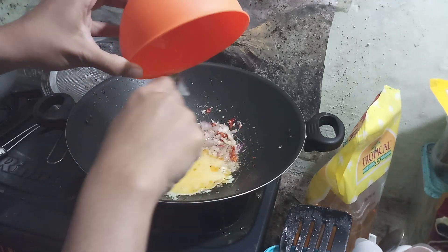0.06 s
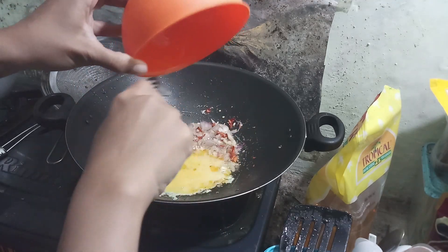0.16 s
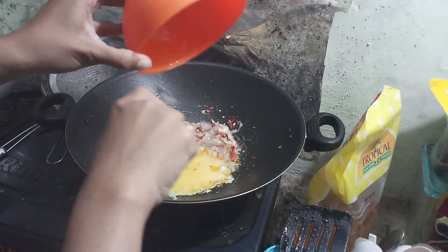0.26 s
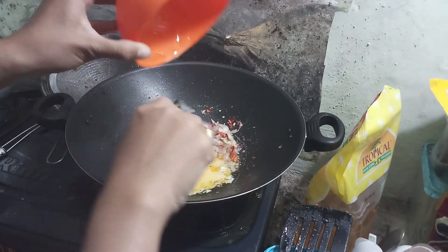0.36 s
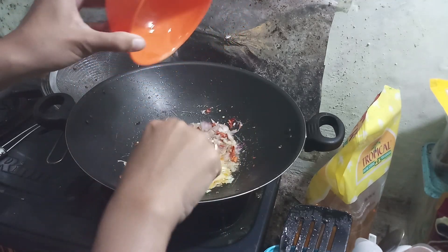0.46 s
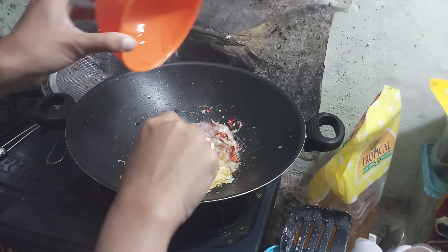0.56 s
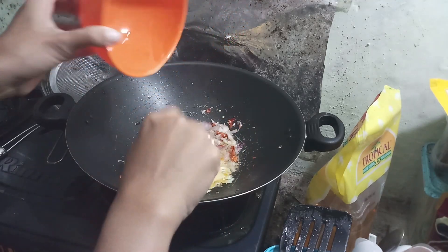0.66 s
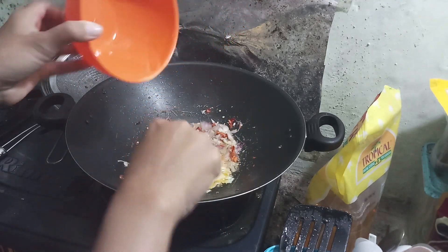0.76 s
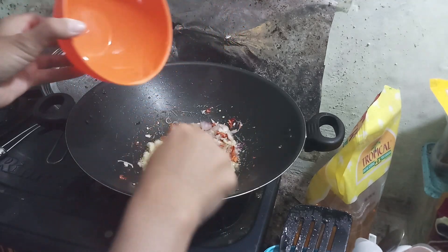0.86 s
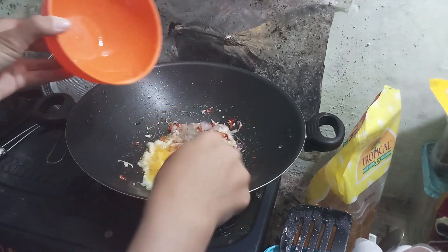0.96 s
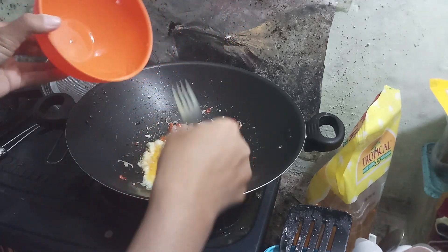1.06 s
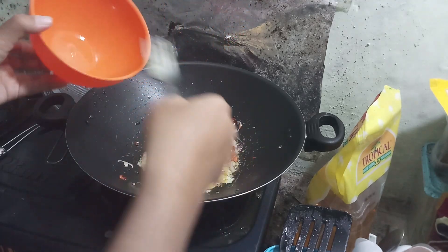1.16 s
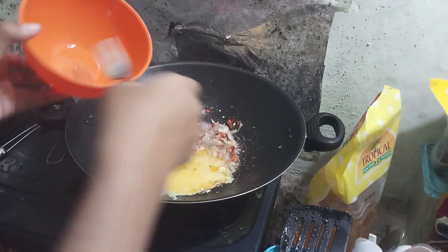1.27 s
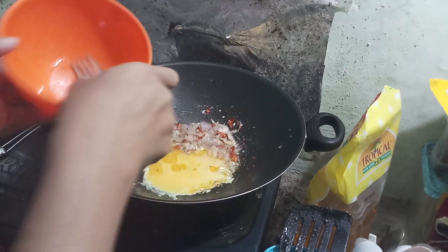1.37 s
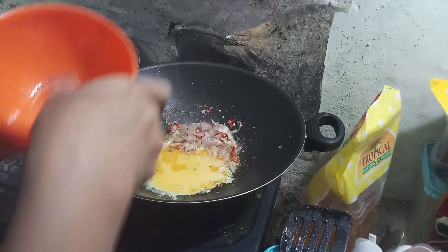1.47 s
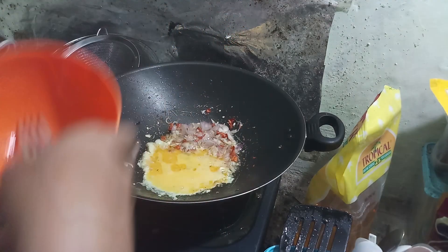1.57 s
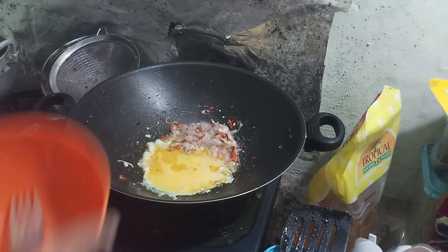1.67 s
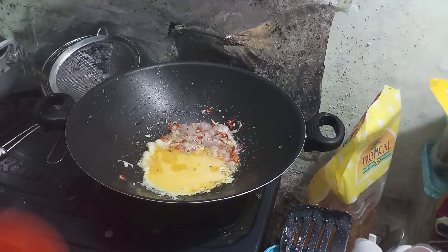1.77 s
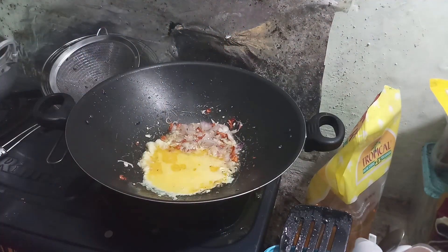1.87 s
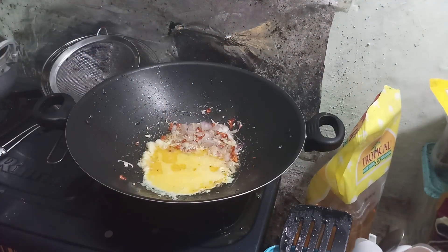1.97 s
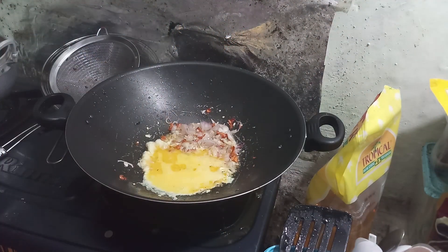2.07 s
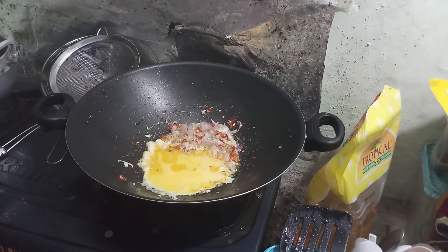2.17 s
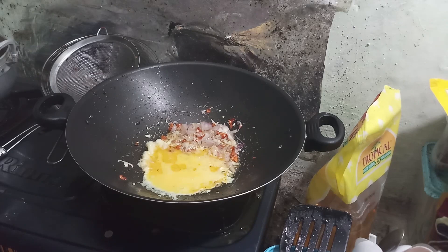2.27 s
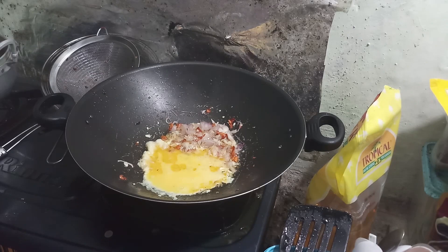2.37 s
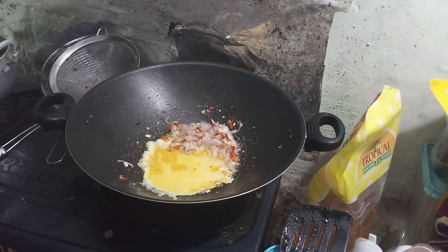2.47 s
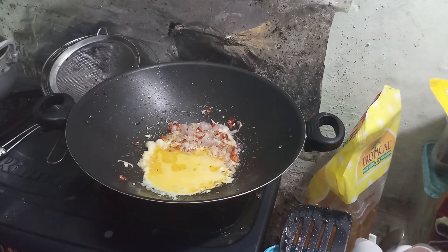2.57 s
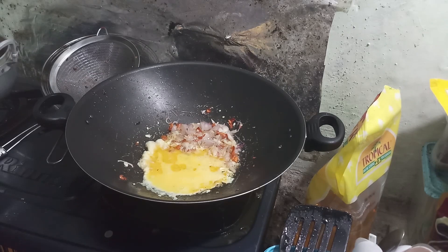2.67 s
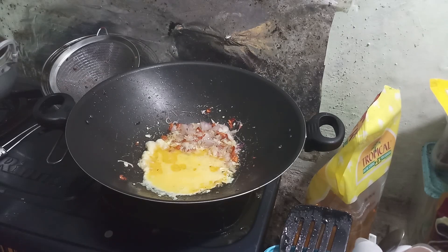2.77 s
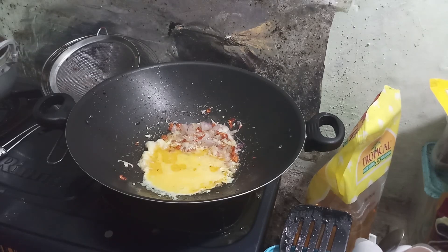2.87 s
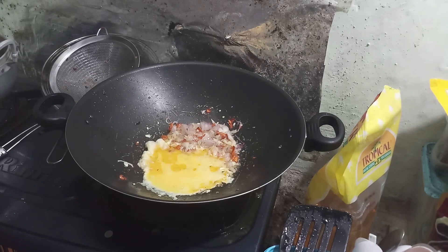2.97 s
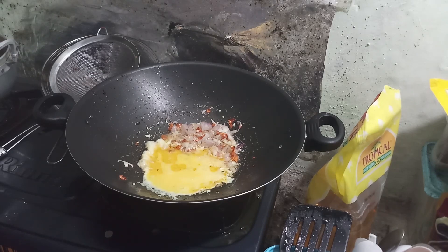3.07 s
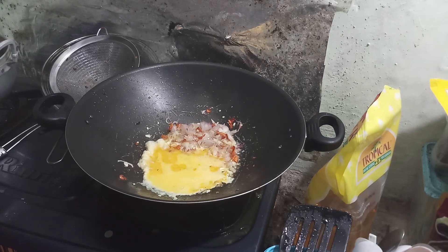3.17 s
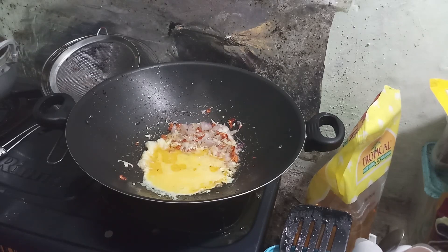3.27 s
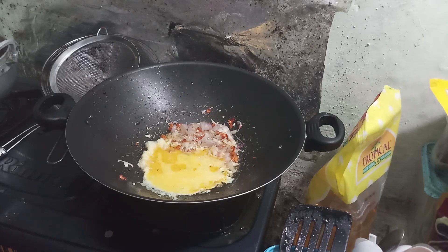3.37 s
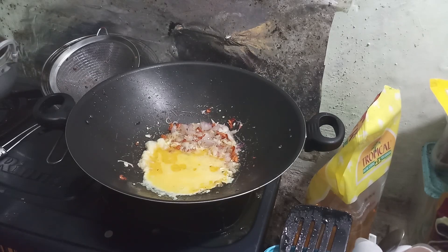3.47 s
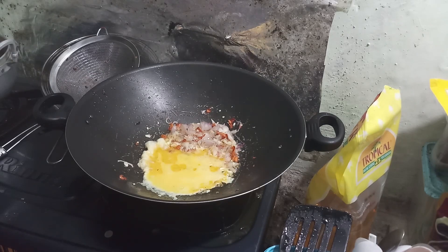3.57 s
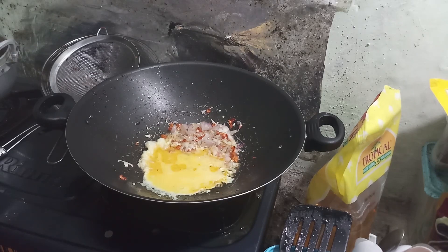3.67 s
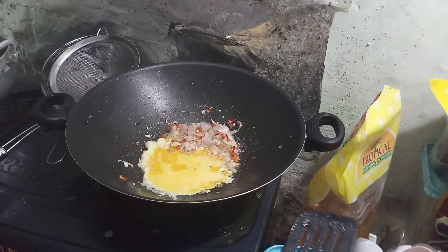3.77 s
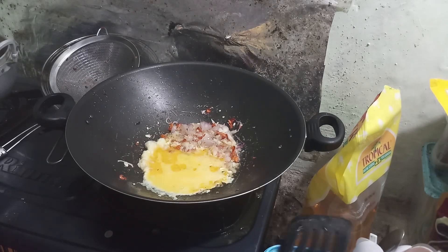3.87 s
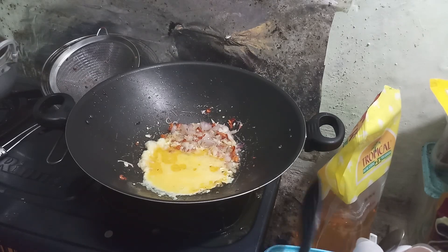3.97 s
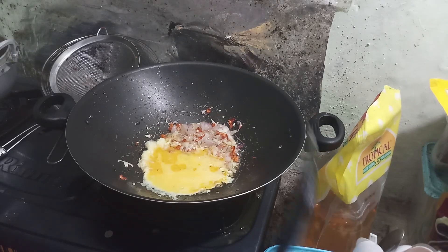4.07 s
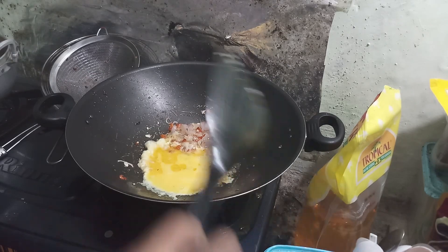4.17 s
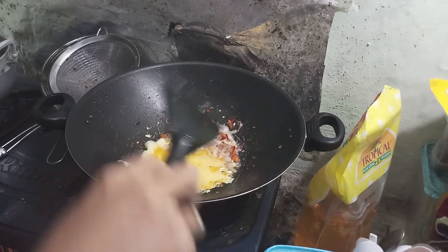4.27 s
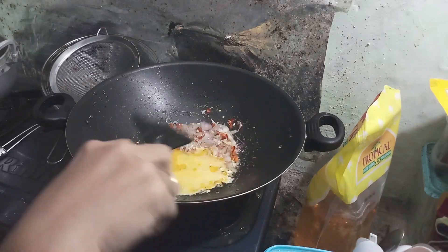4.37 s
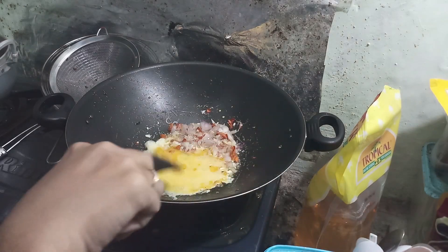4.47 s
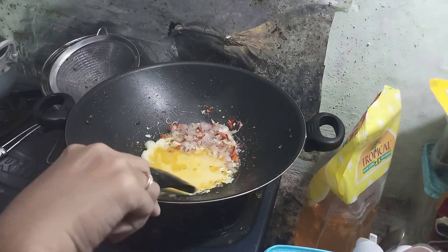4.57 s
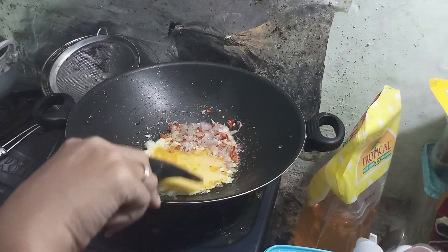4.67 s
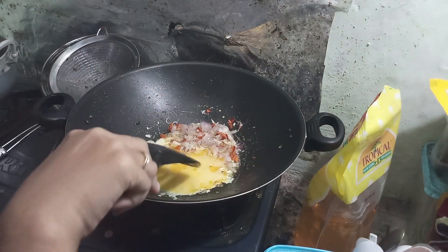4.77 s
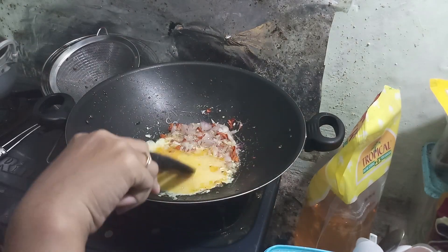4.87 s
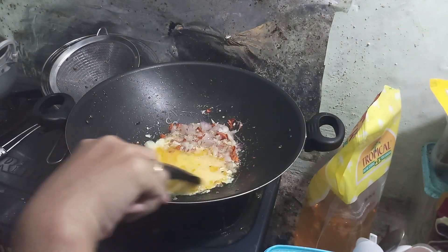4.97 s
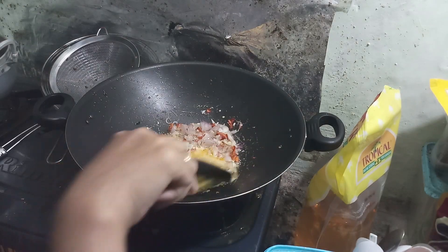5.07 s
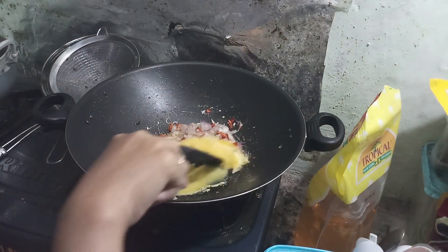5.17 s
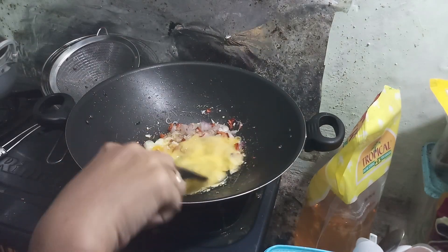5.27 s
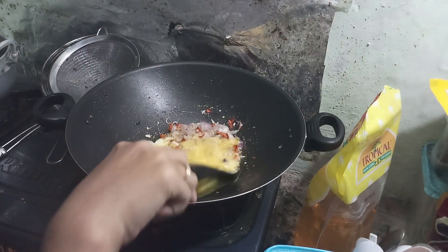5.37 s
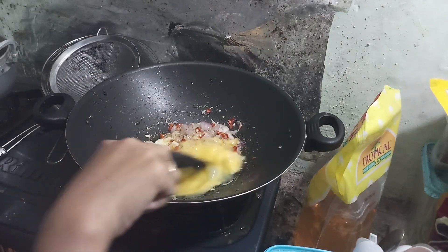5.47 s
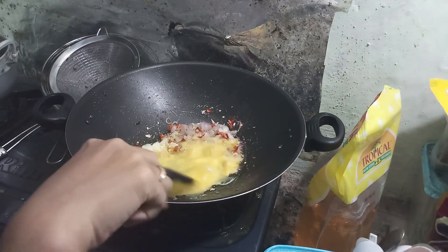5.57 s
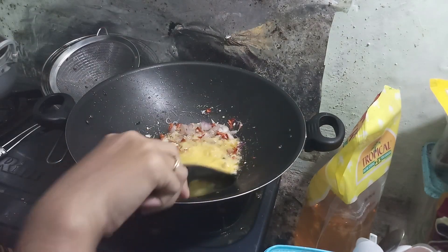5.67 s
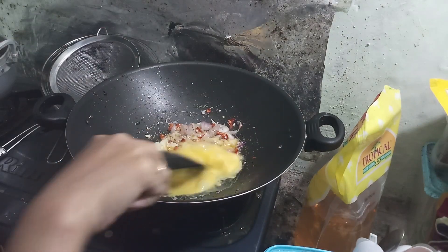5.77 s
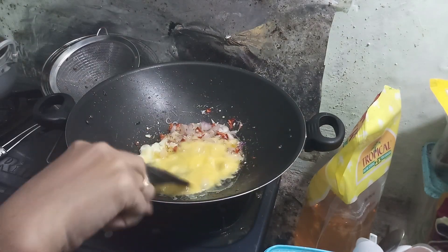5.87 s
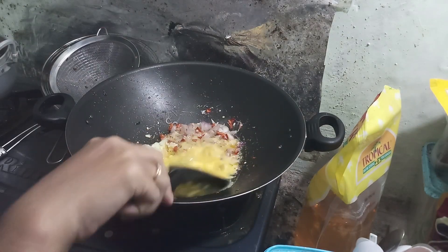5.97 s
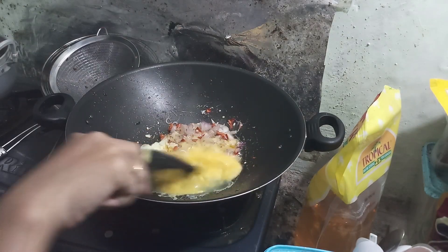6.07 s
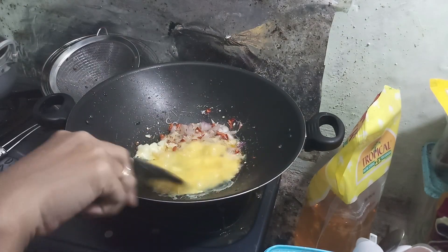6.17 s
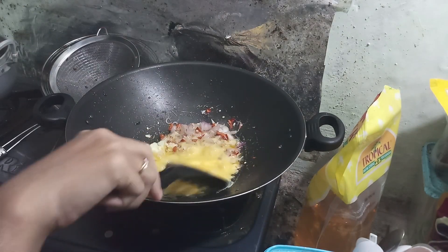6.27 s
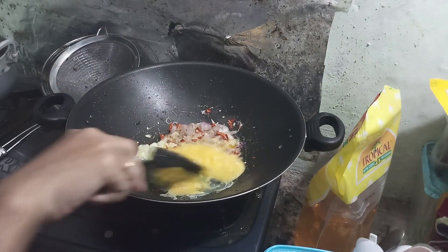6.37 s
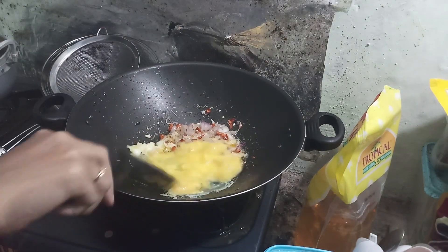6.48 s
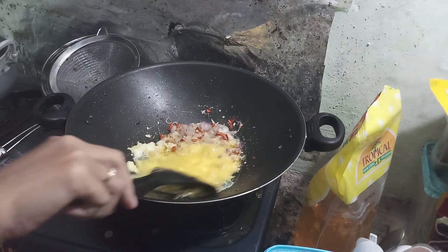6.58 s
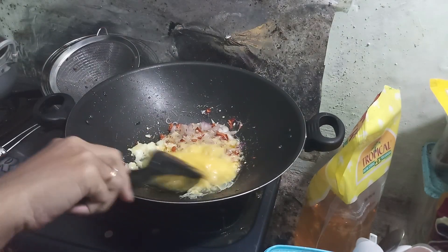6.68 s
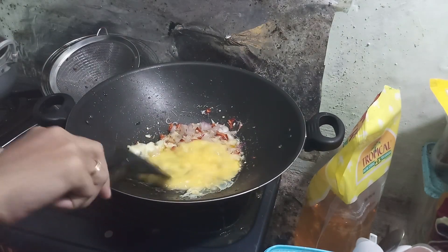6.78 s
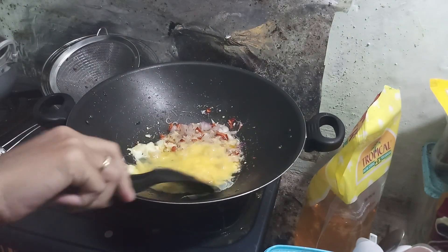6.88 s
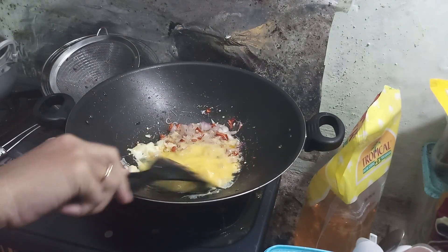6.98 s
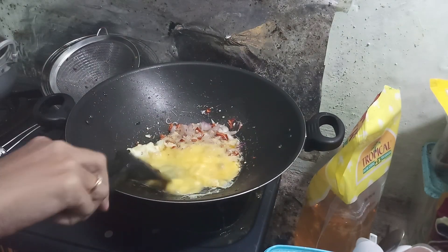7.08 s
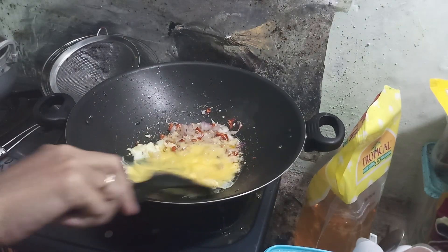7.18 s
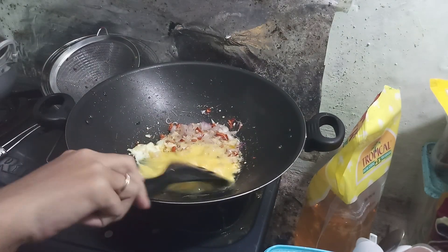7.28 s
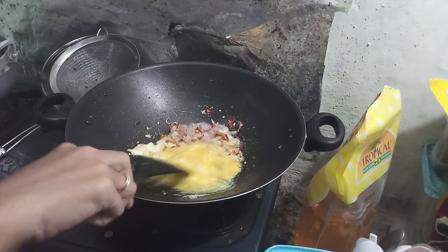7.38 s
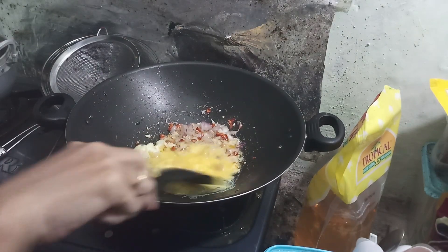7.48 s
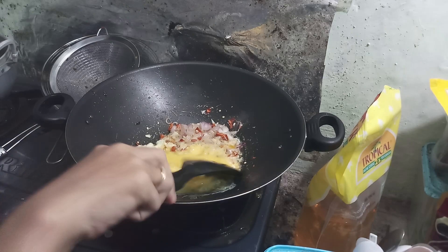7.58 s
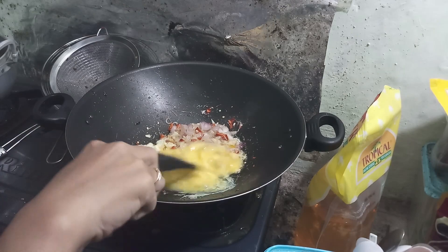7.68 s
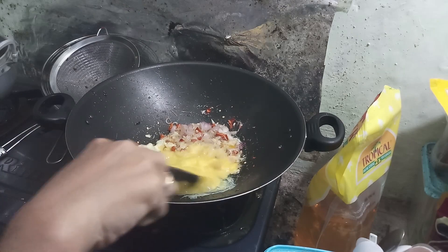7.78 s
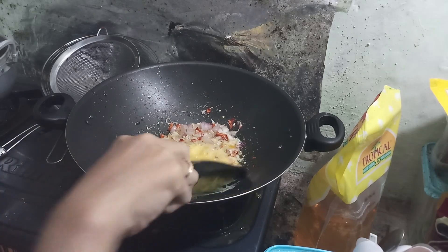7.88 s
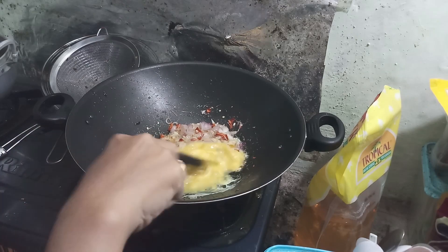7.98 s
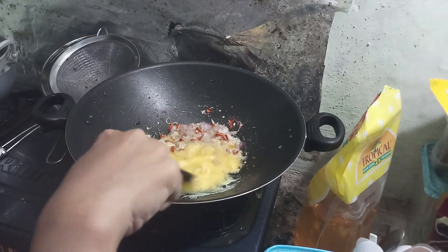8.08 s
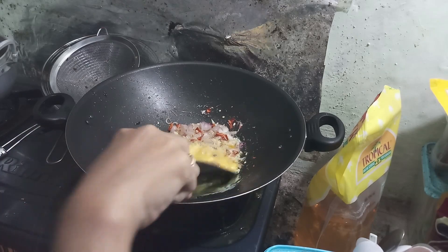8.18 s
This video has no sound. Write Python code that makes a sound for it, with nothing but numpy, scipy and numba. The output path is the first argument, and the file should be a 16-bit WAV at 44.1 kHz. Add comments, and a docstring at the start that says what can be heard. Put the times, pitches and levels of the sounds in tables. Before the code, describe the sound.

Close to the stove in a small kitchen, a soft, steady frying sizzle runs over a low gas rumble. A short spoon scrape and a sharp knock on a plastic bowl come first, then the louder clatter of the bowl landing on the counter. A spatula is lifted with a soft bump and starts stirring, lightly tapping and rasping against the wok as the turned egg hisses.

```python
"""Small kitchen: beaten egg sizzles quietly in a wok, steam bubbles bursting over a rumbling gas flame.
A spoon sticks and slips along a plastic bowl, then knocks it. The bowl is set down and rocks once.
A spatula is picked up with a dull bump, then taps and scrapes through the egg: its slips shake
the wok and rasp at the edge, and fresh egg hisses on the hot metal."""
import sys
import numpy as np
from scipy import signal
from scipy.fft import rfft, irfft, next_fast_len
from scipy.io import wavfile
from scipy.ndimage import uniform_filter1d
from numba import njit

SR = 44100
rng = np.random.default_rng(int(sys.argv[2]) if len(sys.argv) > 2 else 0)


def unload_wav(signal):
    """Save mono or channel-first audio to the path in sys.argv[1] as 16-bit WAV at rate SR, clipped to [-1, 1]."""
    wavfile.write(
        sys.argv[1],
        SR,
        np.round(np.clip(np.atleast_2d(signal).T, -1, 1) * 32767).astype(np.int16),
    )


N = 362502
TIME_S = np.arange(N) / SR
FFT_SIZE = next_fast_len(N, True)

# frying intensity (time [s], relative level [dB])
FRYING_CURVE = [(0.0, -49), (0.75, -51.5), (1.42, -51), (1.6, -49), (2.36, -51), (3.58, -53), (5.1, -51)]
# loudest oil spits (time [s], level [dB], pitch [Hz])
LOUD_SPITS = [(1.191, -46, 9000), (2.2196, -41.5, 7040), (3.6015, -42, 8800), (4.1847, -45.5, 12000),
              (4.262, -43.5, 9900), (4.3628, -46, 6400), (4.6756, -47.5, 4950), (5.005, -44, 5470),
              (6.1249, -43, 3950), (8.178, -39, 9050)]
# stove spectra (frequency [Hz], gain [dB])
SIZZLE_SPECTRUM = [(200, -17), (500, -7), (850, -4), (1200, -2.5), (1700, -0.5), (3000, -0.5), (4400, 0.5),
                   (7500, 0.5), (10000, -3), (12500, -2.5), (16000, -7.5)]
FLAME_SPECTRUM = [(20, -18), (40, -22), (60, -0.5), (75, -6), (97, 2), (125, -8), (170, -13), (240, -27),
                  (345, -15), (450, -35.5), (650, -33), (900, -60), (3000, -54)]
GAS_SPECTRUM = [(700, -31), (1020, -26), (1190, 0.5), (1290, 12), (1380, -14.5), (2000, -35)]
# spoon pushes along the bowl (start [s], length [s], relative level [dB])
SPOON_DRAGS = [(0.0, 0.028, -50), (0.096, 0.22, -45), (0.143, 0.036, -37.5), (0.211, 0.057, -30.5)]
# bowl rubbed, knocked, set down; wok tapped (frequency [Hz], relative level [dB], t60 [s])
BOWL_RUB_MODES = [(484, -7, 0.14), (603, 16, 0.057), (833, -1, 0.059), (917, 2.5, 0.041),
                  (1085, 2.5, 0.063), (1257, 3, .055), (1630, -10.5, .04), (2140, -8.5, 0.013),
                  (4100, -0.5, 0.0037)]
BOWL_KNOCK_MODES = [(353, -3, 0.33), (849, 2, .12), (1305, 8, 0.14), (2290, -8, 0.15), (3370, 5, .12),
                    (3930, -17, 0.055), (4800, -28, .13), (6900, -12, 0.046)]
BOWL_LANDING_MODES = [(172, -12, .3), (318, -7, .3), (533, -6, .22), (614, -3, .18), (800, 0, .14),
                      (937, -6, .28), (1012, -4, .14), (1663, -9, .15), (1717, -4, .16), (2403, -15, .22)]
WOK_TAP_MODES = [(336, -8, 0.3), (540, -15, 0.28), (678, 9, 0.22), (942, 1.5, 0.12), (1316, 7, 0.13),
                 (1576, 14.5, 0.087), (2300, 19, 0.11), (3955, 30.5, 0.014)]
# spoon on bowl, bowl on counter, spatula pickup (time [s], level [dB], contact cutoff [Hz])
KNOCK_HITS = [(1.4772, -19.5, 12000), (1.4848, -19, 15000), (1.502, -30.5, 6000), (1.511, -35, 15000),
              (1.5665, -35.5, 1400), (1.578, -39, 8000), (1.593, -38, 4000)]
LANDING_HITS = [(2.8149, -13, 2520), (2.8174, -22, 12000), (2.855, -30.5, 14000), (2.8746, -30.5, 15000),
                (3.003, -41, 2500), (3.009, -47, 2500)]
BUMP_HITS = [(3.869, -38, 9000), (3.882, -34.5, 400), (3.906, -48, 1300), (3.924, -41.5, 500)]
# spectra of those impacts (frequency [Hz], gain [dB])
KNOCK_SPECTRUM = [(59, -51), (110, -5), (365, -14.5), (700, -10.5), (900, -6.5), (1100, -12), (1280, 1.5),
                  (1500, -11), (2220, -3), (2860, -12.5), (3940, 1), (5080, -12.5), (6800, -8.5),
                  (16000, -21)]
LANDING_SPECTRUM = [(40, -22), (110, -7), (230, -3.5), (320, -3.5), (420, -5), (620, -4.5), (850, 3),
                    (1120, -5.5), (1650, -6.5), (2050, -13.5), (2400, -6.5), (2800, -15.5), (3600, -8),
                    (5600, -8), (9000, -15.5), (16000, -17)]
BUMP_SPECTRUM = [(50, -26), (100, 10.5), (170, 3), (330, -1), (700, -6.5), (1300, -16.5), (4000, -14),
                 (7000, -9), (11000, -24)]
# blade taps on the wok (time [s], level [dB], contact pitch [Hz])
TAP_HITS = [(5.017, -48, 1360), (5.245, -42, 1800), (5.4535, -38, 517), (5.8296, -40.5, 696),
            (5.9593, -39.5, 846), (6.0671, -43.5, 1070), (6.2412, -34.5, 815), (6.558, -39, 830),
            (6.6996, -38.5, 314), (6.9436, -41.5, 1010), (7.189, -44, 1330), (7.5093, -40, 764),
            (7.657, -29, 4930), (7.6585, -36.5, 1290), (7.8361, -41, 825), (7.9633, -40.5, 1290),
            (8.1384, -40, 885)]
# spatula strokes, relative levels
# (start [s], length [s], push [dB], edge scrape [dB], egg hiss [dB], contact pitch [Hz])
SPATULA_STROKES = [(5.173, 0.14, -48.5, -46.5, -50, 1550), (5.347, 0.2, -50, -48, -57, 1060),
                   (5.532, 0.068, -49, -39.5, -47.5, 1670), (5.726, 0.058, -59, -44, -47, 1900),
                   (5.814, 0.063, -42, -43.5, -52, 950), (5.897, 0.097, -51, -50, -53, 1150),
                   (6.155, 0.17, -48.5, -47.5, -51, 1200), (6.352, 0.15, -45, -46.5, -53, 1100),
                   (6.503, 0.18, -49.5, -49, -51, 1360), (6.682, 0.22, -45, -47, -53, 1050),
                   (7, 0.14, -42, -46, -51, 1200), (7.297, 0.067, -48.5, -47, -47, 1240),
                   (7.38, 0.094, -48, -49, -66, 1050), (7.549, 0.11, -54, -45, -60, 1400),
                   (7.682, 0.062, -46.5, -45, -48.5, 1030), (7.823, 0.13, -51, -48.5, -55.5, 1000),
                   (7.944, 0.17, -46, -46.5, -49.5, 1190), (8.105, 0.093, -48, -44.5, -50.5, 1360)]
# hollow wok under the blade, blade edge, fresh egg (frequency [Hz], gain [dB])
WOK_SPECTRUM = [(60, -21), (150, -9.5), (210, -3.5), (245, -6), (290, 1.5), (350, 2.5), (420, -5.5),
                (520, -2.5), (750, -10), (1100, -30), (2500, -60)]
EDGE_SPECTRUM = [(300, -24), (550, -3), (700, 7), (980, 4.5), (1250, 0), (1420, 1), (1600, -2),
                 (2300, -0.5), (3200, -4.5), (5000, -19), (12000, -14)]
EGG_SPECTRUM = [(1500, -15), (3000, -2), (3900, 0), (4400, 5.5), (6100, -0.5), (8000, -3.5), (10000, -11),
                (12500, -11), (16000, -17)]
# kitchen decay (frequency [Hz], t60 [s])
ROOM_T60 = [(100, 0.48), (400, 0.29), (1500, 0.41), (5000, 0.3), (14000, 0.13)]
# diffuse field (frequency [Hz], left-right coherence [ratio])
COHERENCE = [(60, 1), (130, 0.88), (290, 0.79), (640, 0.26), (1400, 0.019), (15000, 0.06)]
# microphone port imbalance (frequency [Hz], left minus right [dB])
PORT_BALANCE = [(60, -2), (200, 0.5), (380, -6), (700, 5.5), (1290, 2), (2400, 0.5), (4400, 1.5),
                (8100, -1), (15000, 3)]


def from_db(db):
    """Decibels to gain."""
    return 10 ** (np.asarray(db) / 20)


def unit_rms(x):
    """Scale to rms 1."""
    return x / np.sqrt(np.mean(x ** 2) + 1e-20)


def at_hz(table, hz):
    """Interpolate on a log-frequency axis."""
    knots_hz, values = np.transpose(table)
    return np.interp(np.log(hz), np.log(knots_hz), values)


def colour(x, spectrum):
    """Minimum-phase filter with the given spectrum."""
    size = 2 * next_fast_len((x.shape[-1] + SR // 4) // 2, True)
    hz = np.maximum(np.fft.rfftfreq(size, 1 / SR), 1)
    cepstrum = irfft(np.log(from_db(at_hz(spectrum, hz))), size)
    cepstrum[1:size // 2] *= 2
    cepstrum[size // 2 + 1:] = 0
    return irfft(rfft(x, size) * np.exp(rfft(cepstrum)), size)[..., :x.shape[-1]]


def convolve(x, response):
    """Mono signal through a stereo response."""
    return signal.oaconvolve(x[None], response, axes=1)[:, :len(x)]


def soften(x, cutoff_hz):
    """First-order low-pass, as from a soft contact."""
    return signal.sosfilt(signal.butter(1, min(cutoff_hz, SR * .45), fs=SR, output="sos"), x)


def resonate(x, hz, q):
    """One broad resonance."""
    radius = np.exp(-np.pi * hz / q / SR)
    return signal.lfilter([1, 0, -1], [1, -2 * radius * np.cos(2 * np.pi * hz / SR), radius ** 2], x)


@njit
def glide(x, step_rad, damping):
    """Resonance with a moving centre, given as phase step per sample."""
    out, low, band = np.zeros(len(x)), 0., 0.
    for i in range(len(x)):
        low += step_rad[i] * band
        band += step_rad[i] * (x[i] - low - damping * band)
        out[i] = band / np.sqrt(step_rad[i])
    return out


def diffuse(size):
    """Noise from all sides: coherent bass, unrelated treble."""
    coherence = np.clip(at_hz(COHERENCE, np.fft.rfftfreq(size, 1 / SR) + 1), -1, 1)
    mid, side = rfft(rng.standard_normal((2, size)))
    return unit_rms(irfft(np.sqrt(1 + coherence) * mid + np.sqrt(1 - coherence) * side * [[1], [-1]], size))


def steady_noise(spectrum):
    """Coloured diffuse noise, rms 1."""
    return unit_rms(colour(diffuse(FFT_SIZE)[:, :N], spectrum))


def kitchen(direct_db, tail_db, early_t60_s=0.052):
    """Room response: direct sound and band-wise tail, in dB re the early reflections."""
    t = TIME_S[:SR // 2]
    noise, hz = rfft(diffuse(len(t))), np.fft.rfftfreq(len(t), 1 / SR)
    # small surfaces near the stove reflect little bass
    early = unit_rms(irfft(noise * hz / (hz + 300), len(t)) * from_db(-60 * t / early_t60_s))
    edges_hz = [40, 300, 1200, 3500, 8000, 17000]
    tail = 0
    for low, high in zip(edges_hz, edges_hz[1:]):
        band = irfft(noise * (hz >= low) * (hz < high), len(t))
        tail = tail + band * from_db(-60 * t / at_hz(ROOM_T60, np.sqrt(low * high)))
    direct = np.zeros_like(early)
    direct[0, 0] = direct[1, 2] = 1   # right lags 2 samples
    return from_db(direct_db) * unit_rms(direct) + early + from_db(tail_db) * unit_rms(tail)


def ringing(modes):
    """Decaying sines, unit energy."""
    t = TIME_S[:SR // 2]
    ring = sum(from_db(db - 60 * t / t60_s) * np.sin(2 * np.pi * hz * t) * (-1) ** k
               for k, (hz, db, t60_s) in enumerate(modes))
    return ring / np.linalg.norm(ring)


def struck(spectrum, modes, ring_db):
    """Short crack plus the body's modes."""
    crack = colour(signal.unit_impulse(SR // 2), spectrum)
    return crack / np.linalg.norm(crack) + from_db(ring_db) * ringing(modes)


def place_hits(rows, sound):
    """Place sound(hz) per row; level is the rms of the first 8 ms."""
    out, attack = np.zeros((2, N + SR)), int(.008 * SR)
    for time_s, db, hz in rows:
        hit, start = sound(hz), int(time_s * SR)
        out[:, start:start + hit.shape[1]] += from_db(db) * hit / hit[:, :attack].std()
    return out[:, :N]


def grains(per_s, spread_db):
    """Random clicks, many small, a few large."""
    sizes = from_db(spread_db * np.minimum(rng.exponential(1, N), 4))
    return unit_rms((rng.random(N) < per_s / SR) * sizes * rng.choice([-1, 1], N))


def in_wok(clicks, force, spectrum, direct_db, tail_db, moves_per_s=7, spots=4):
    """Clicks under a force curve, cycling through spots in the wok, each with its own reflections."""
    out = 0
    for spot in range(spots):
        offset = (TIME_S * moves_per_s - spot + 1) % spots - 1
        nearness = np.sqrt(np.maximum(1 - np.abs(offset), 0))
        response = colour(kitchen(direct_db, tail_db, early_t60_s=0.07), spectrum)
        out = out + convolve(clicks * force * nearness, response) / convolve(clicks[-SR:], response).std()
    return out


def gestures(starts_s, lengths_s, levels_db, attack_s, sag_db_per_s, release_db_per_s):
    """Gain of a run of pushes: rise, sag while held, release."""
    out = np.zeros(N)
    for start_s, length_s, db in zip(starts_s, lengths_s, levels_db):
        span = slice(max(int(start_s * SR), 0), int((start_s + length_s + 1) * SR))
        age_s = TIME_S[span] - start_s
        fall_db = sag_db_per_s * age_s + release_db_per_s * np.maximum(age_s - length_s, 0)
        out[span] = np.maximum(out[span], np.clip(age_s / attack_s, 0, 1) * from_db(db - fall_db))
    return out


def sizzle(flicker_db=1.22, flicker_hz=27):
    """Tiny steam bubbles merge into a flickering hiss; larger ones crackle."""
    heat = from_db(np.interp(TIME_S, *np.transpose(FRYING_CURVE)))
    flicker = unit_rms(soften(soften(rng.standard_normal(N), flicker_hz), flicker_hz))
    hiss = from_db(1.2 + flicker_db * flicker) * heat * steady_noise(SIZZLE_SPECTRUM)
    pops = grains(per_s=1200, spread_db=4.5)
    crackle = in_wok(pops, from_db(-3.5) * heat, SIZZLE_SPECTRUM, direct_db=-4, tail_db=-33, spots=2)
    return hiss + crackle


def burner():
    """The flame rumbles; gas hisses in the burner tube."""
    rumble = from_db(-57) * steady_noise(FLAME_SPECTRUM)
    return rumble + from_db(-64.5) * steady_noise(GAS_SPECTRUM)


def spoon_drag(slip_hz=305, wander=.3):
    """Uneven stick-slip on plastic; only a firm push wakes the two lowest modes."""
    force = gestures(*np.transpose(SPOON_DRAGS), attack_s=0.015, sag_db_per_s=0, release_db_per_s=400)
    rate_hz = slip_hz * np.exp(wander * unit_rms(uniform_filter1d(rng.standard_normal(N), size=120)))
    slips = np.diff(np.floor(np.cumsum(rate_hz) / SR), prepend=0) * from_db(rng.normal(0, 2.5, N))
    friction = slips + from_db(-21) * rng.standard_normal(N)
    room = kitchen(direct_db=3, tail_db=-11, early_t60_s=.03)
    deep = unit_rms(convolve(friction, convolve(ringing(BOWL_RUB_MODES[:2]), room)))
    upper = unit_rms(convolve(friction, convolve(ringing(BOWL_RUB_MODES[2:]), room)))
    firmness = (force / force.max()) ** 0.28
    bowl = force * (from_db(-0.5) * firmness * deep + from_db(1) * upper)
    return signal.sosfilt(signal.butter(3, 400, "high", fs=SR, output="sos"), bowl)


def oil_spits(per_s=1.9, small_db=-51, spread_db=2.5, small_hz=6500, spread_oct=.4):
    """Oil spits in bright ticks: loud ones at set times, small ones at random."""
    times_s = np.cumsum(rng.exponential(1 / per_s, 40))
    size, pitch = rng.uniform(-1, 1, (2, 40))
    small = np.transpose([times_s, small_db + spread_db * size, small_hz * 2 ** (spread_oct * pitch)])
    return place_hits([*LOUD_SPITS, *small[times_s < N / SR]], lambda hz: resonate(
        kitchen(direct_db=-3, tail_db=-6, early_t60_s=0.037), hz, q=2.6))


def spoon_knocks():
    """The spoon strikes the bowl, which rings briefly."""
    knock = struck(KNOCK_SPECTRUM, BOWL_KNOCK_MODES, ring_db=-14)
    return place_hits(KNOCK_HITS, lambda hz: soften(
        convolve(knock, kitchen(direct_db=-8, tail_db=-13, early_t60_s=0.064)), hz))


def bowl_landing():
    """The bowl hits the counter and rocks once."""
    landing = struck(LANDING_SPECTRUM, BOWL_LANDING_MODES, ring_db=-10.5)
    return place_hits(LANDING_HITS, lambda hz: soften(
        convolve(landing, kitchen(direct_db=-9.5, tail_db=-8, early_t60_s=0.086)), hz))


def spatula_pickup():
    """The spatula bumps dully as it is lifted."""
    bump = colour(kitchen(direct_db=-1, tail_db=-5), BUMP_SPECTRUM)
    return place_hits(BUMP_HITS, lambda hz: soften(bump, hz))


def spatula_taps():
    """The blade touches the wok; food damps the ring."""
    wok = signal.unit_impulse(SR // 2) + from_db(-10) * ringing(WOK_TAP_MODES)
    return place_hits(TAP_HITS, lambda hz: resonate(
        convolve(wok, kitchen(direct_db=-6, tail_db=-19, early_t60_s=0.1)), hz, q=4.2))


def spatula_strokes(bite_s=0.02):
    """Blade slips shake the wok and rasp at the contact pitch; turned egg hisses until it sets."""
    start_s, length_s, push_db, edge_db, hiss_db, contact_hz = np.transpose(SPATULA_STROKES)
    in_egg = np.clip((TIME_S - start_s[0]) / bite_s, 0, 1)

    def envelope(levels_db, rest_db, attack_s=bite_s, sag_db_per_s=26, release_db_per_s=230):
        """Stroke gain over a floor: the blade drags lightly between strokes."""
        strokes = gestures(start_s, length_s, levels_db, attack_s, sag_db_per_s, release_db_per_s)
        return np.maximum(strokes, in_egg * from_db(rest_db))

    push = from_db(2) * envelope(push_db, rest_db=-57.5)
    edge = from_db(2.4) * envelope(edge_db, rest_db=-53.5)
    fresh = from_db(4.5) * envelope(
        hiss_db, rest_db=-60, attack_s=0.028, sag_db_per_s=16, release_db_per_s=148)
    pitch_hz = np.interp(TIME_S, start_s + length_s / 2, contact_hz)
    slips = glide(grains(per_s=700, spread_db=2.5), 2 * np.pi * pitch_hz / SR, damping=1.0)
    body = in_wok(grains(per_s=700, spread_db=1), push, WOK_SPECTRUM, direct_db=9.5, tail_db=3)
    rasp = in_wok(slips, edge, EDGE_SPECTRUM, direct_db=-22.5, tail_db=-29)
    hiss = in_wok(grains(per_s=2200, spread_db=6.5), fresh, EGG_SPECTRUM, direct_db=-17, tail_db=-45)
    return body + rasp + hiss


def scene():
    """The stove, heard from just above the wok."""
    return (sizzle() + burner() + spoon_drag() + oil_spits() + spoon_knocks() + bowl_landing()
            + spatula_pickup() + spatula_taps() + spatula_strokes())


def record(dry):
    """Each microphone port adds its own colour; steep treble cut."""
    cutoff_hz = 15900
    ports = [colour(channel, [(hz, side * db / 2) for hz, db in PORT_BALANCE])
             for channel, side in zip(dry, (1, -1))]
    return signal.sosfilt(signal.ellip(12, .1, 70, cutoff_hz, fs=SR, output="sos"), ports)


dry = scene()
out = record(dry)
unload_wav(out)
```